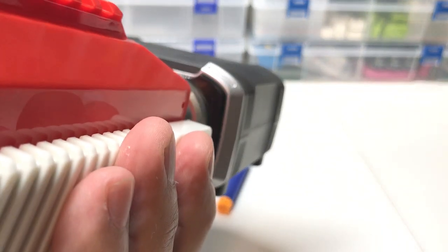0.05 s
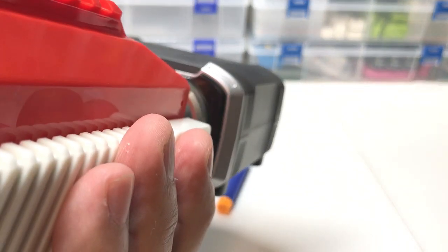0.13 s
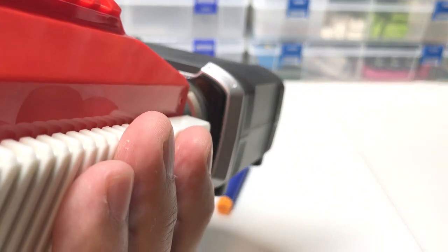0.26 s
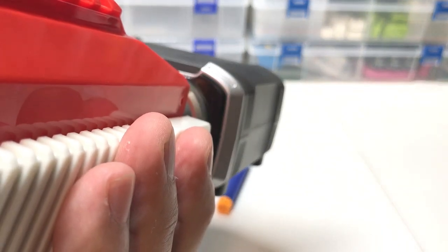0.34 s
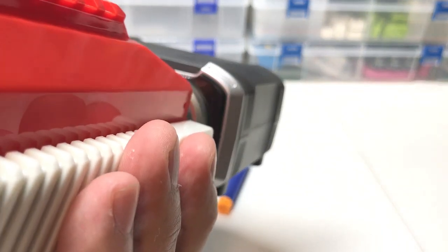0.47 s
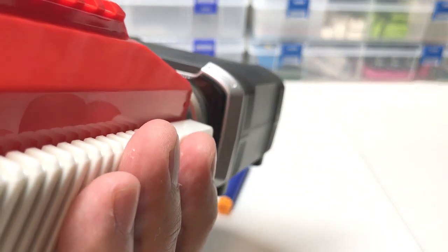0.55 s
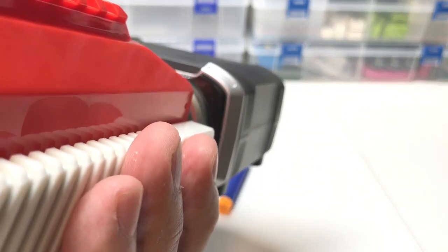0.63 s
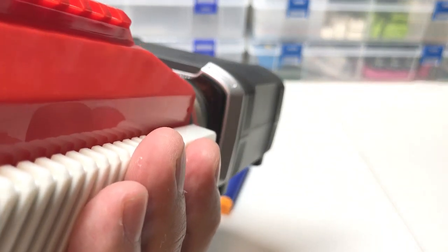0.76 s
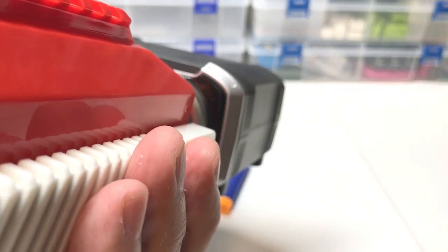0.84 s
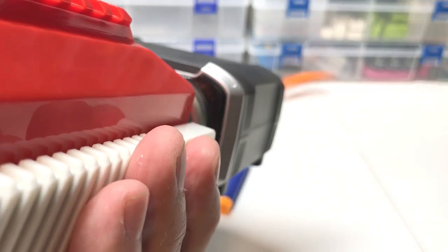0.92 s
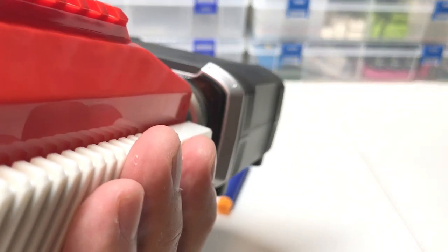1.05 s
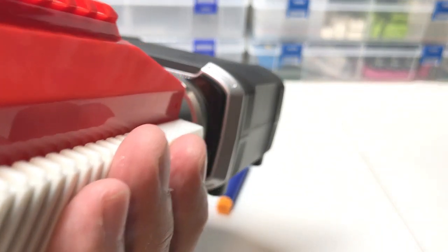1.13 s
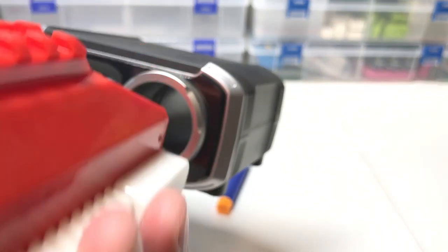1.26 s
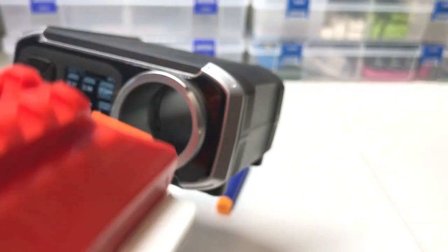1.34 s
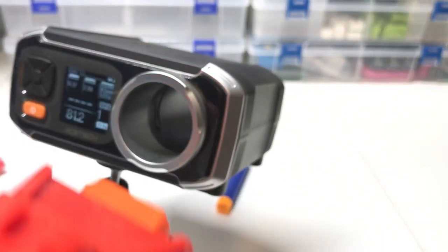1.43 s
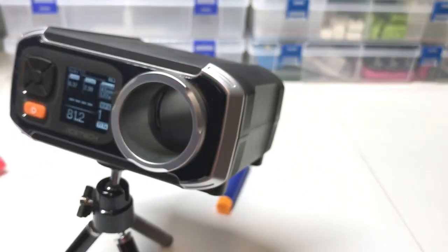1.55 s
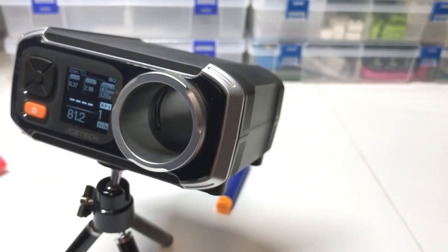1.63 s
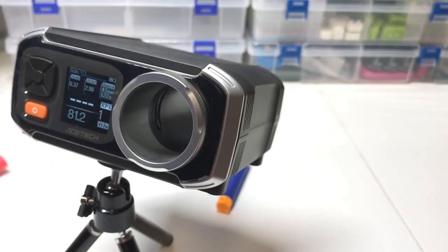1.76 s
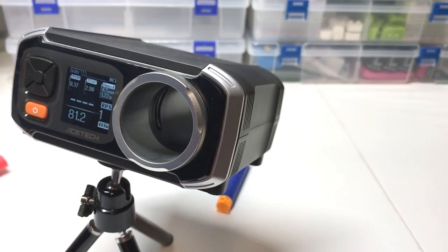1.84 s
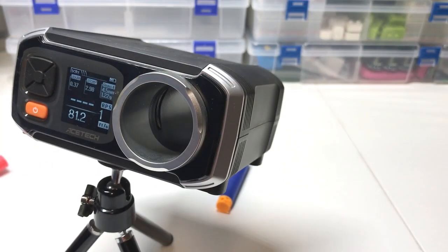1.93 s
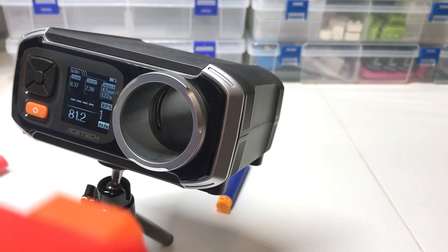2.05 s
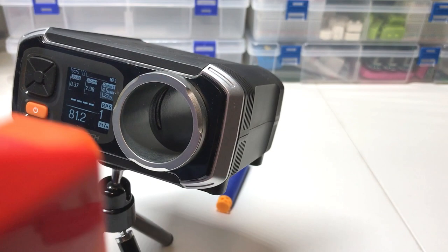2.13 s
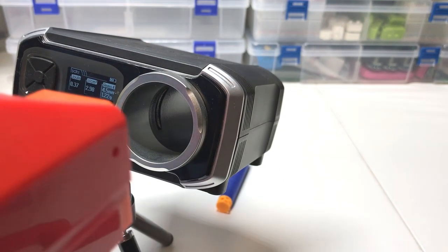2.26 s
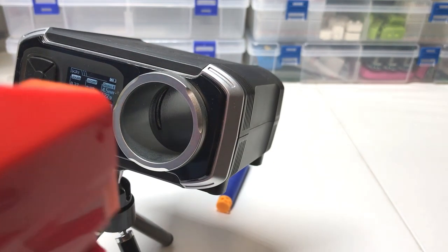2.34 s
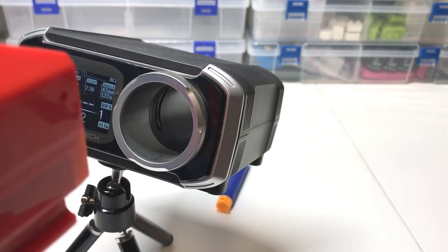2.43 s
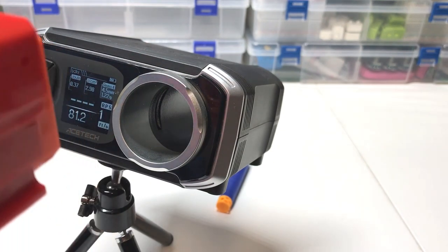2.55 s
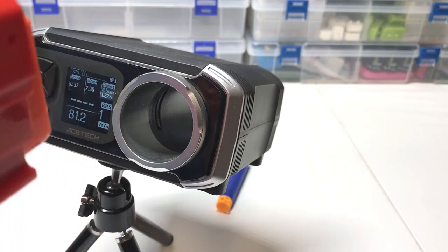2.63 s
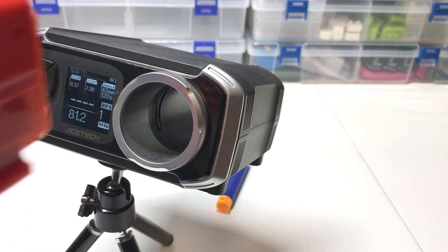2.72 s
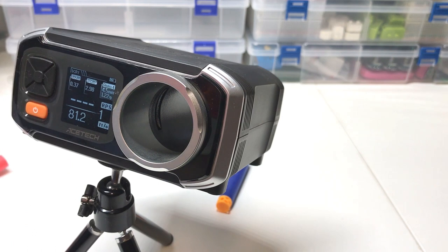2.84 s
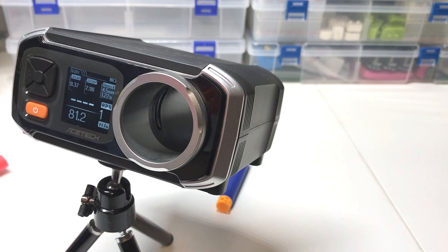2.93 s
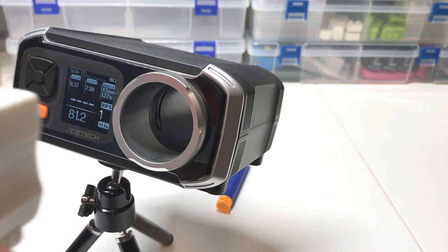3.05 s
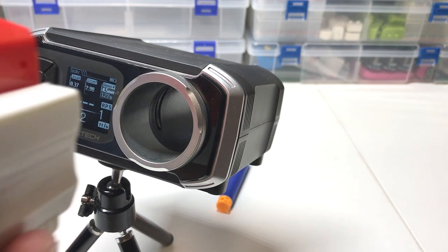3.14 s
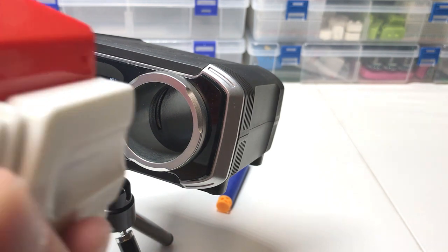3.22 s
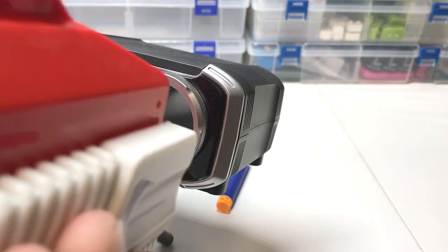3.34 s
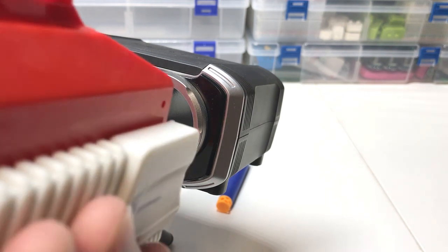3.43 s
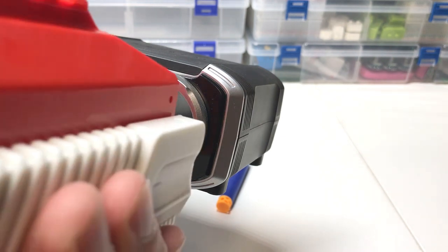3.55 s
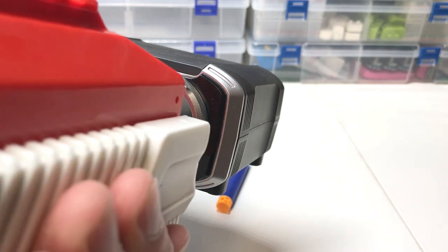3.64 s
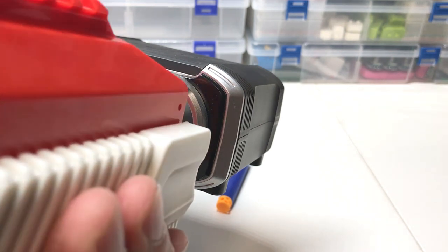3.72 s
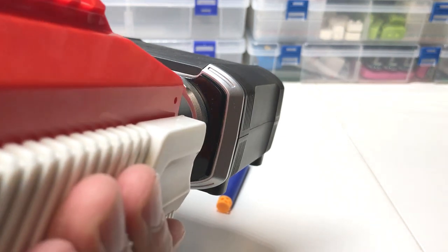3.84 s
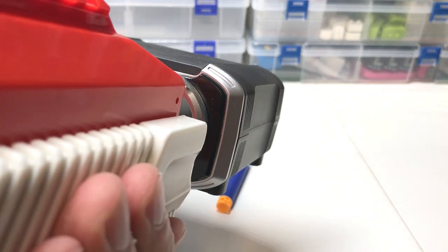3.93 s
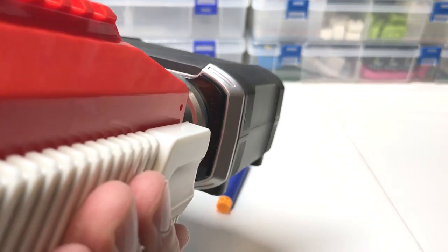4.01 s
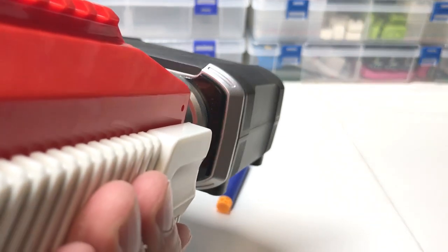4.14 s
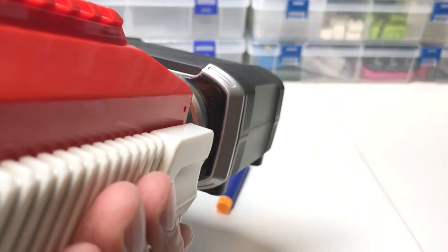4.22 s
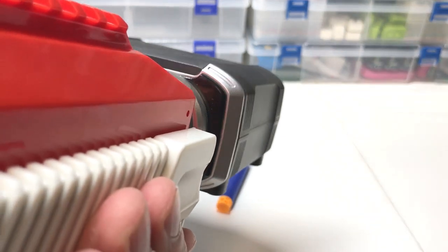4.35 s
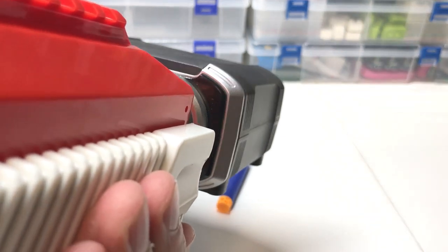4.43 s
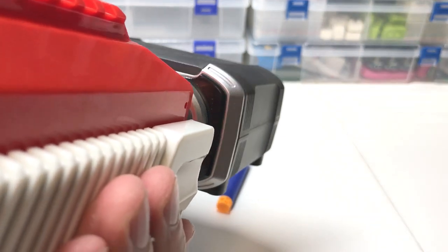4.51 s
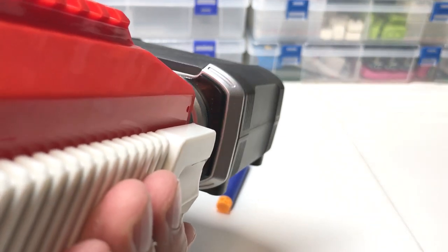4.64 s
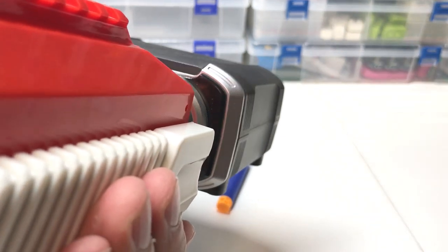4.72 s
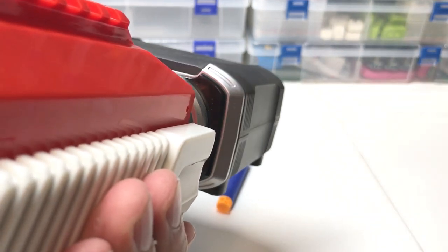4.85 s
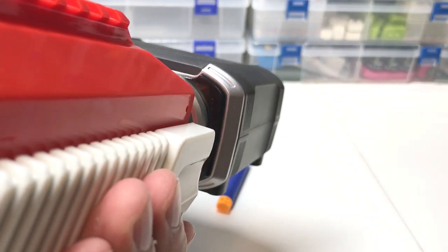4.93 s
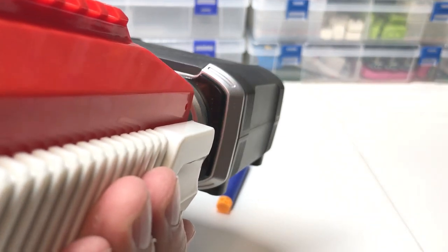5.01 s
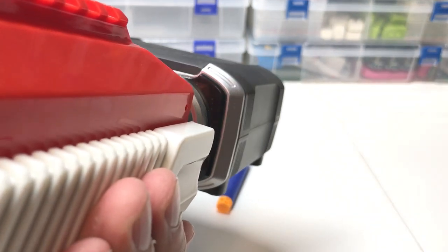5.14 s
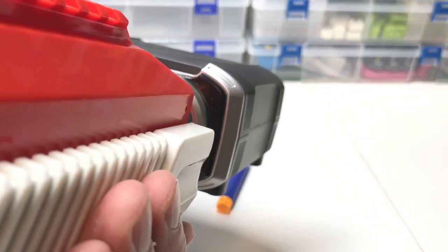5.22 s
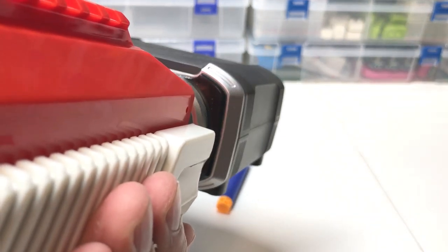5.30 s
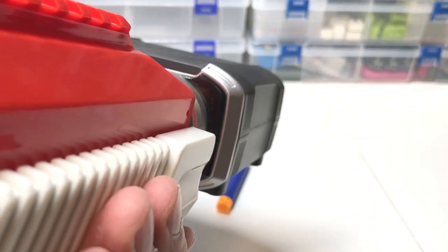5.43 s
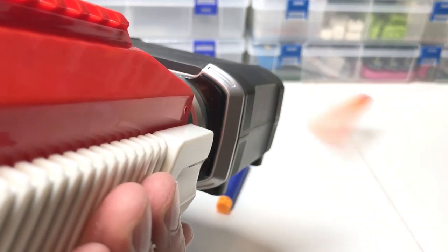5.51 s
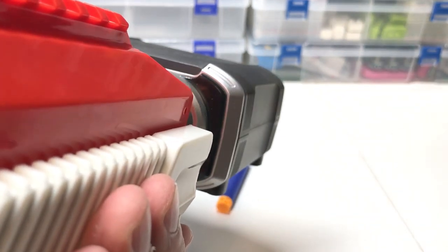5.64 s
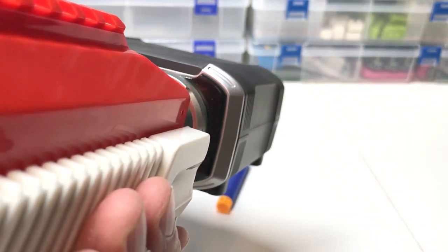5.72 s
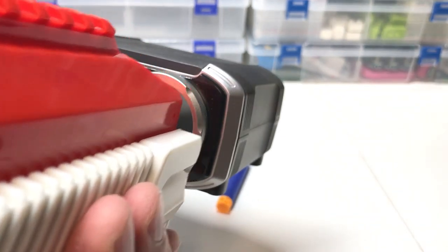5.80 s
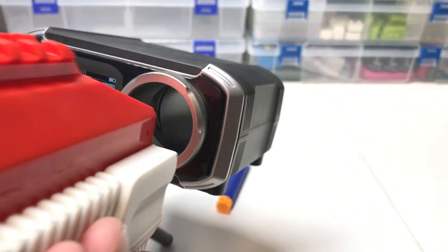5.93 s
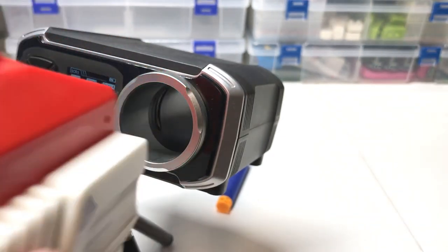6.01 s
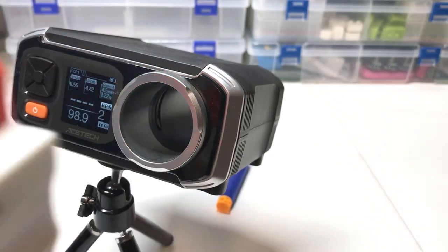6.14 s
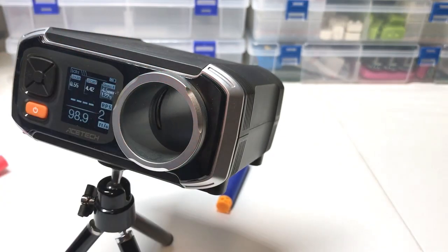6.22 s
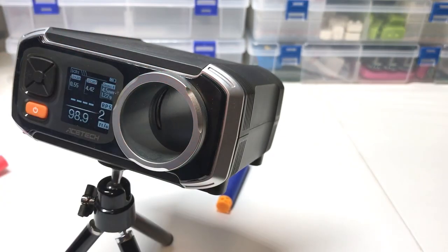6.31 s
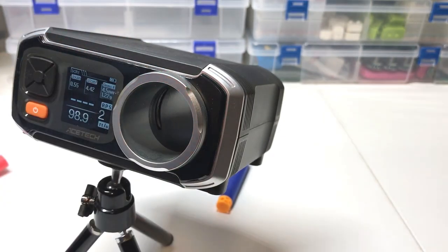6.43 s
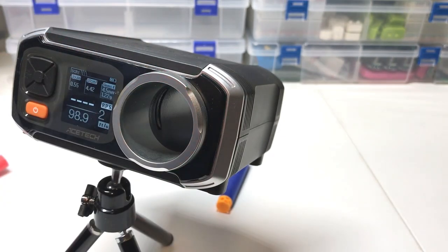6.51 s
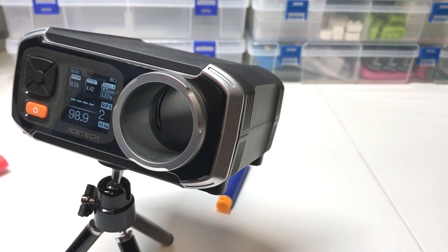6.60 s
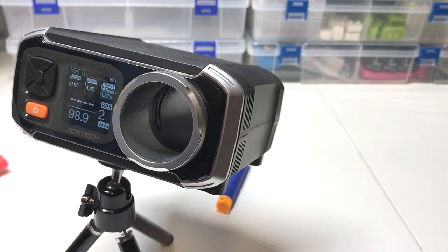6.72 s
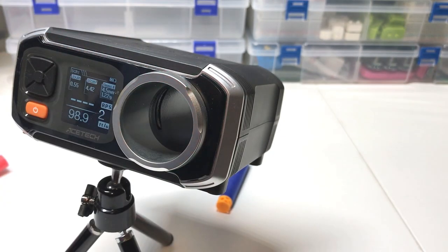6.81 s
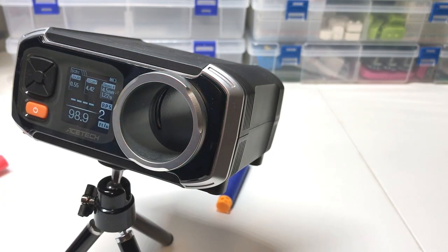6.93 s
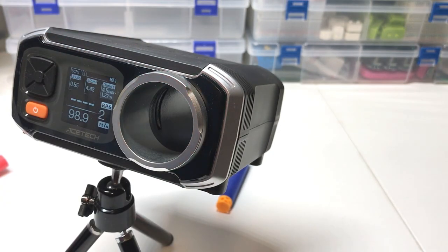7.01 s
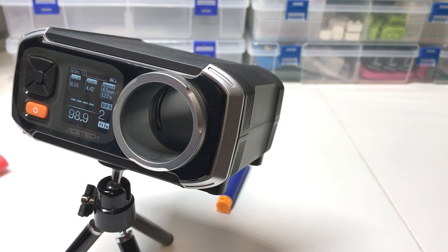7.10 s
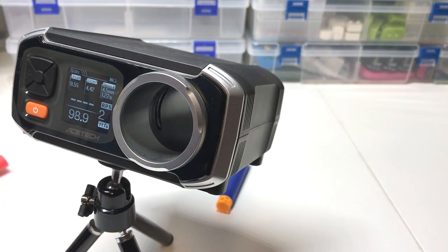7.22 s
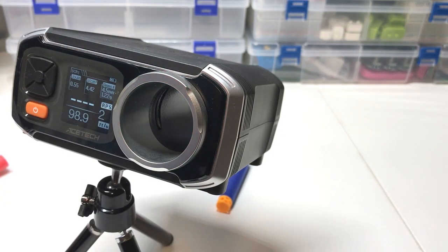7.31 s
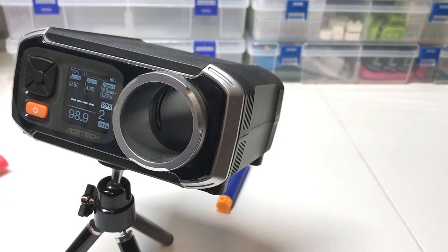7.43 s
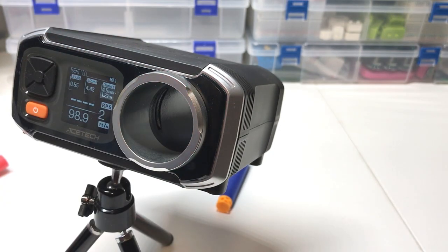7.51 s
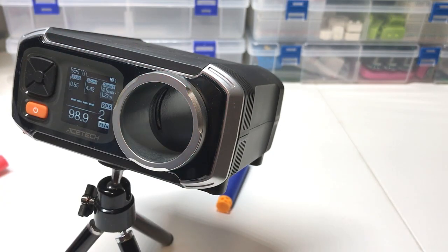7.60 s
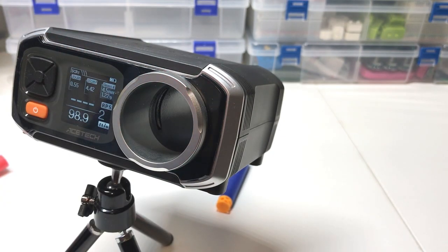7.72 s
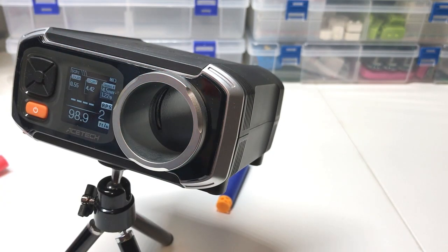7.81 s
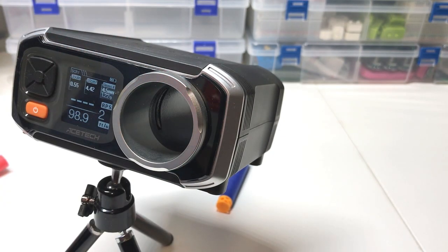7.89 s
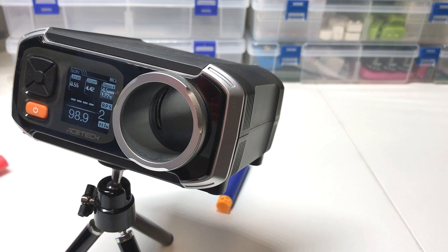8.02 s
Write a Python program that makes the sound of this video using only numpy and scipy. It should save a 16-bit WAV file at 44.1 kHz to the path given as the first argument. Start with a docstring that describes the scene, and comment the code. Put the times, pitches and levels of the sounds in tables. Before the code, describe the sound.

A small quiet room hums low for almost a second. At about 1.0 s a spring toy blaster fires right by the microphone: a brief swelling squeal, a bright overloaded plastic crack, a low air pop and quick upward whip, then grainy rattle and faint spring ringing. Around 1.2-1.5 s a dart drops on the table with hollow knocks and light clicks. Priming follows: a hard chattering clack at 2.1 s, gritty slide scrapes, and a louder, thumping clunk near 2.9 s. A dull low thud at 3.5 s and small ticks at 3.7-3.8 s settle into near silence, with very faint alternating ticks from 4 to 5.3 s. The second shot cracks at 5.56 s, similarly clipped and short. Loose clicks continue, with sharper clacks at 6.8 and 7.0 s, scraping, and a strong hollow clunk at 7.57 s, then small rattles fading until about 8 s.

```python
"""A spring blaster is fired, primed by hand, held still and fired again, close by in a small quiet room that hums low.
Each shot opens with the plunger's run: a squeal of noise that grows into the slam. The slam rattles the resonant
shell and overloads the input, then a pop and a rising whip of air; the rattle trails off in grains, spring tones ring.
After the first shot a dart drops on the table, then slides scrape as uneven grains while catches and loose parts
clack as chattering blows on the shell. Two faint ticks beat before the second shot; more handling follows it."""
import sys
import numpy as np
from scipy import signal
from scipy.fft import rfft, irfft
from scipy.io import wavfile
from scipy.ndimage import uniform_filter1d

SR = 44100
rng = np.random.default_rng(int(sys.argv[2]) if len(sys.argv) > 2 else 0)


def file_out(sig):
    """Save sig as 16-bit WAV at sys.argv[1]."""
    # one column per channel
    cols = np.atleast_2d(sig).T
    # limit, then scale
    lim = np.clip(cols, -1, 1)
    pcm = np.round(lim * 32767).astype(np.int16)
    wavfile.write(sys.argv[1], SR, pcm)


N = 355446


def undb(db):
    """Decibels to an amplitude factor."""
    return 10 ** (np.asarray(db) / 20)


def fade(t, t60):
    """Exponential decay that has lost 60 dB after t60 seconds."""
    return np.exp(-np.log(1000) * t / t60)


def unit(x):
    """Scale x to an RMS of 1."""
    return x / np.sqrt(np.mean(x ** 2))


def add(out, start_s, x):
    """Mix x into out from start_s on, cut at the end of the scene."""
    i = int(start_s * SR)
    out[i:i + len(x)] += x[:N - i]


def resonate(x, hz, width_hz):
    """Two-pole resonance along the last axis, gain 1 at the centre."""
    return signal.lfilter(*signal.iirpeak(hz, hz / width_hz, SR), x)


def grit(shape, spread_db):
    """Dense tiny impacts of very uneven size."""
    return rng.standard_normal(shape) * undb(spread_db * rng.exponential(size=shape))


# Colour of the room hum: pitch_hz [Hz], density_db [dB per Hz, relative]
HUM_COLOUR = [(12, -39.5), (20, -7.5), (60, 5), (107, -11.5), (204, -6.5), (285, -14), (472, -14.5),
              (527, -19), (949, -17), (1480, -23), (2670, -34.5), (2990, -35.5), (7520, -43),
              (12800, -44.5), (16000, -53.5)]
HUM_DB = -51  # RMS level


def hum():
    """Steady room tone: noise shaped to a spectrum that is strongest in the bass."""
    hz = np.maximum(np.fft.rfftfreq(N, 1 / SR), 1)
    pitch_hz, density_db = np.transpose(HUM_COLOUR)
    colour = undb(np.interp(np.log(hz), np.log(pitch_hz), density_db))
    noise_spectrum = rfft(rng.standard_normal(N))
    return undb(HUM_DB) * unit(irfft(noise_spectrum * colour, N))


ROOM_T60_S, ROOM_TREBLE_T60_S, ROOM_DB = 0.11, 0.14, -15.5


def room(x):
    """Diffuse tail from shelves and walls: decaying noise whose treble lasts slightly longer."""
    t = np.arange(SR // 2) / SR
    noise = rng.standard_normal(len(t))
    low = signal.lfilter(*signal.butter(1, 3000, fs=SR), noise)
    tail = low * fade(t, ROOM_T60_S) + (noise - low) * fade(t, ROOM_TREBLE_T60_S)
    tail = tail * (1 - np.exp(-t / 0.015))  # the reflections build up first
    return undb(ROOM_DB) * signal.fftconvolve(x, tail / np.linalg.norm(tail))[:N]


# Borders between the bass, low, high and treble rings [Hz]
BAND_EDGES_HZ = (900, 2300, 5000)
# Modes of the hollow shell: pitch_hz [Hz], width_hz [Hz], level_db [dB]
SHELL_MODES = [(167, 113, -1), (229, 74, -1.5), (366, 130, -0.5), (510, 100, -5), (632.6, 160, 0),
               (1050, 180, 1.5), (1289.5, 140, 4.5), (1552, 390, 2.5), (2095, 360, 0.5), (2510, 440, 1.5),
               (2983, 410, 2.5), (3700, 850, -0.5), (4438, 470, -2), (5280, 620, 1.5), (6165, 490, 0.5),
               (6810, 630, 0.5), (8850, 1800, -1.5), (9960, 2400, -2.5), (11900, 2600, -4.5),
               (14800, 2100, -8.5)]


def shell(force, pitch_hz, focus_db, scatter_db):
    """Bass, low, high and treble modal rings for each row of force, with mode levels that vary by row."""
    luck = rng.standard_normal((len(force), len(SHELL_MODES)))
    parts = np.zeros((4,) + force.shape)
    for k, (hz, width_hz, level_db) in enumerate(SHELL_MODES):
        part = np.searchsorted(BAND_EDGES_HZ, hz)
        # low and high modes weaken away from the main pitch, up to one octave off
        octaves_off = np.minimum(np.abs(np.log2(hz / pitch_hz)), 1) * (part in (1, 2))
        sign = (-1) ** k
        gain = sign * undb(level_db - focus_db * octaves_off + scatter_db * luck[:, k])
        ring = resonate(resonate(force, hz, 3.5 * width_hz), hz, width_hz)
        parts[part] += gain[:, None] * ring
    return parts


# Uneven grainy scrapes on the shell, and the rattle trailing off after each shot: full_s [s], hold_s [s],
# level_db [dB], rise_db_per_s [dB/s], fall_db_per_s [dB/s], treble_db [dB over level_db]
SCRAPES_AND_TAILS = [(1.098, 0.0092, -49, 899.5, 126, -21), (1.28, .04, -48, 150, 120, -12),
                     (1.47, .1, -57, 60, 60, -9), (2.05, 0.068, -42.5, 569, 300, -9.5),
                     (2.185, .02, -34, 279, 149.5, -12), (2.303, 0.078, -46, 150, 115, -4),
                     (2.54, .09, -59.5, 100, 62, -10), (2.833, 0.077, -30, 580.5, 245, -2),
                     (3.026, 0.22, -63, 100.5, 67.5, -2.5), (3.64, .14, -62, 60, 161.5, -9),
                     (5.655, 0.011, -48, 899, 174, -17), (5.882, 0.1, -56.5, 50.5, 136, -8),
                     (6.198, 0.0091, -51.5, 221.5, 190, -29), (6.46, .05, -62, 60, 150, 0),
                     (6.826, 0.048, -51, 67, 102, -7.5), (6.981, .02, -36, 218, 159, -7),
                     (7.048, 0.097, -45.5, 151, 84, 2.5), (7.578, 0.02, -36.5, 198, 115.5, -2),
                     (7.856, 0.22, -70, 55, 49.5, -3)]


def grain_levels_db(t):
    """Level in dB of each scrape or shot tail at times t: straight rise, hold, straight fall."""
    full_s, hold_s, level_db, rise, fall, _ = np.transpose(SCRAPES_AND_TAILS)[:, :, None]
    before_s, after_s = np.maximum(full_s - t, 0), np.maximum(t - full_s - hold_s, 0)
    return level_db - np.abs(rise) * before_s - np.abs(fall) * after_s


def scrapes_and_tails():
    """Tiny grains in uneven spurts, coloured by the shell, for the scrapes and the shots' trailing rattle."""
    steps = np.repeat(rng.standard_normal(N // 256 + 1), 256)[:N]
    spurts = uniform_filter1d(steps, size=256)
    grains = grit(N, 0.91) * undb(3.8 * spurts)
    _, low, high, treble = shell(grains[None], 1800., focus_db=0, scatter_db=0)[:, 0]
    gains = undb(grain_levels_db(np.arange(N) / SR))
    treble_gain = undb(np.array(SCRAPES_AND_TAILS)[:, 5]) @ gains
    body = unit(low) + undb(-3.5) * unit(high)
    return gains.sum(axis=0) * body + treble_gain * unit(treble)


# Hollow knocks: start_s [s], level_db [dB], pitch_hz [Hz], t60_s [s]
THUDS = [(1.232, -22, 246, 0.14), (1.236, -44, 159.7, 1), (2.086, -44, 130, 0.065),
         (2.882, -21, 108, 0.085), (2.884, -14.5, 398, 0.13), (3.472, -19.5, 59.6, 0.15),
         (7.572, -8, 393, 0.074)]


def thuds():
    """Soft pushes that each set one low mode going: a decaying sine with a rounded start."""
    t, out = np.arange(SR // 2) / SR, np.zeros(N)
    for start_s, level_db, pitch_hz, t60_s in THUDS:
        onset = 1 - np.exp(-t * pitch_hz / 2.0)
        add(out, start_s, undb(level_db) * onset * np.sin(2 * np.pi * pitch_hz * t) * fade(t, t60_s))
    return out


# Catches, stops and loose parts hitting the shell: start_s [s], level_db [peak dB of the low ring],
# pitch_hz [Hz], high_db [dB over level_db], treble_db [dB over level_db], chatter_t60_s [s]
CLACKS = [(1.169, -36, 1440, -7, -11, 0.043), (1.216, -32, 1314, -6.5, -11, .15),
          (1.228, -23.5, 1270, -7.5, -19, 0.17), (1.243, -32.5, 1670, -11, -9, 0.09),
          (1.264, -28.5, 2020, -1.5, -8, .077), (1.3353, -22, 3400, 1.5, -18, .026),
          (1.359, -35, 2050, -7, -16, .028), (1.404, -34, 1300, -8, -0.5, 0.047),
          (1.425, -28.5, 2230, 2, -12.5, .048), (1.444, -37, 2340, -13, -27, 0.1),
          (1.4974, -45, 6200, -4, 3, .05), (1.5421, -36.5, 1420, 3.5, -3.5, 0.018),
          (1.655, -38.5, 1620, -3.5, -15, 0.074), (1.674, -45, 1570, -15, -24, 0.027),
          (1.829, -48, 1290, -12, -13, 0.039), (2.018, -33.5, 1390, -6, -11, 0.071),
          (2.0268, -20, 1270, -4.5, -10.5, 0.072), (2.065, -25, 1490, -4, -14, .096),
          (2.077, -13.5, 1270, -7, -22, 0.11), (2.083, -8, 1350, -3, -8.5, 0.077),
          (2.115, -30.5, 1440, 4.5, -1, 0.091), (2.127, -24.5, 1800, -10.5, -10.5, 0.22),
          (2.189, -28.5, 3980, 2, -18, 0.021), (2.207, -18, 3990, 8, 0, 0.078),
          (2.231, -19, 1380, -18, -12, 0.096), (2.25, -39.5, 1720, 16, 12, 0.059),
          (2.266, -34, 2680, 4, 2, .035), (2.289, -47, 2770, 7, 5, .099),
          (2.342, -34.5, 1270, 1.5, -5, 0.03), (2.377, -36.5, 3420, 3, -19, 0.07),
          (2.44, -31, 1500, -4.5, -19, 0.041), (2.476, -40, 1820, -1.5, -24, 0.061),
          (2.4948, -34.5, 1580, -12, -33, .023), (2.537, -36, 1120, -2, -13, 0.059),
          (2.596, -48, 1160, -16, -23, 0.03), (2.68, -41, 1220, -8, -29, .031),
          (2.731, -30, 1950, -5.5, -30, 0.06), (2.805, -16.5, 1560, -1, -11, 0.071),
          (2.831, -27, 1210, -11, -6.5, 0.24), (2.847, -25.5, 1320, 3.5, -9, 0.17),
          (2.856, -10.5, 1710, -21, -16.5, .055), (2.876, -14, 2420, 5.5, -3, 0.098),
          (2.8802, -6.5, 1410, -6, -6, 0.082), (2.954, -35, 1500, 0.5, 0, 0.078),
          (2.977, -42, 1680, 1, 0, 0.067), (3.023, -43, 3100, 0.5, -26, 0.13),
          (3.142, -61.5, 1080, 8.5, 9, 0.11), (3.308, -54.5, 3720, 3.5, 2, .083),
          (3.378, -40.5, 1450, 0, -16.5, 0.056), (3.674, -45.5, 2190, -5.5, -30, .1),
          (3.709, -36.5, 3360, -0.5, -21, 0.063), (3.765, -45, 1280, -3, -28, .044),
          (3.802, -36.5, 1870, 3.5, -11, 0.082), (3.816, -33.5, 3170, 0, -14, 0.077),
          (4.02, -42.5, 1673, -7.5, -14, .061), (4.437, -62.5, 3500, 6.5, -12.5, 0.049),
          (4.652, -62.5, 3480, 8, -12.5, 0.047), (5.15, -63.5, 3300, 7, -13.5, .05),
          (5.69, -42.5, 1620, -2.5, -14, 0.056), (5.77, -30.5, 1280, -3, -17, 0.027),
          (5.793, -36, 1590, -6, -2.5, 0.037), (5.9278, -29.5, 1440, -0.5, -13, 0.11),
          (5.944, -34.5, 1240, -16, -6, 0.096), (5.963, -33, 1455, -2, -9.5, .098),
          (6.1345, -54, 1010, -9, -1, 0.11), (6.155, -41, 2330, 0.5, -12, 0.13),
          (6.1915, -39.5, 2930, 5.5, -6, 0.039), (6.2225, -33.5, 2070, -5, -16, 0.065),
          (6.2433, -27, 1340, -9.5, -26, 0.09), (6.4226, -48.5, 1046, 0, -12.5, 0.077),
          (6.565, -43.5, 1110, -6, -11.5, 0.11), (6.5986, -34.5, 1420, -7.5, -25, 0.36),
          (6.621, -27, 1420, 0, -8, 0.069), (6.65, -29, 1320, -14, -24, 0.057),
          (6.7444, -40.5, 1390, -8, -14, 0.16), (6.763, -34.5, 1630, -4, -14, 0.23),
          (6.782, -15.5, 2380, -5.5, -13, 0.086), (6.9134, -33.5, 1320, -3.5, -19, 0.19),
          (6.9291, -27, 1410, -8, -18, .046), (6.982, -26, 4060, 3, -6.5, 0.15),
          (6.9955, -14.5, 1920, -2, -1.5, 0.092), (7.0197, -21.5, 1630, 0, -1, 0.073),
          (7.146, -44, 1170, -2.5, -27, 0.05), (7.208, -39, 1310, -3, -13, 0.11),
          (7.237, -32, 1920, 1, -2, 0.14), (7.305, -27, 2200, 0, -2.5, 0.073),
          (7.3802, -36.5, 1860, -2, -23, .084), (7.454, -45, 1280, -8, -29, .05),
          (7.4675, -26, 1890, -2.5, -7.5, 0.29), (7.494, -21.5, 980, -4.5, -11.5, 0.19),
          (7.5324, -18.5, 1960, -8, -17, 0.059), (7.542, -16.5, 1700, -7, -13, .19),
          (7.5683, -6.5, 1375, -6.5, -6.5, 0.11), (7.643, -42, 1600, 7, -12, 0.055),
          (7.656, -41, 1740, 9, 1, 0.068), (7.73, -40, 1770, 3, -6, 0.042),
          (7.913, -40.5, 1920, -5, -14, 0.14), (7.94, -46, 1210, -3, -14, .079),
          (7.959, -31, 2380, 2, -4.5, 0.075), (7.998, -47, 1330, -6, -23, .077),
          (8.043, -45.5, 1890, 3, -11, 0.039)]
# Two faint beats, each about four a second: start_s [s], level_db [peak dB of the low ring]
TICKS = [(4.0675, -49), (4.287, -50), (4.529, -45), (4.766, -42), (4.994, -43), (5.25, -48)]
TOCKS = [(3.9355, -49), (4.2, -47.5), (4.455, -51), (4.708, -51.5), (4.949, -54.5), (5.183, -50)]
# Their colours: pitch_hz [Hz], high_db [dB], treble_db [dB], chatter_t60_s [s]
TICK_COLOUR = (3124, -1.5, -22, .058)
TOCK_COLOUR = (1404, -11, -27, .06)
# Colour of small ticks shaken loose: high_db [dB], treble_db [dB], chatter_t60_s [s]
LOOSE_COLOUR = (-3, -12.5, .07)
LOOSE_COUNT = 50
LOOSE_DB, LOOSE_SPREAD_DB = 3.5, 2.5  # over the loudest scrape or tail at that moment, give or take


def blows():
    """All blows as columns: the listed clacks, the faint beats and loose ticks at random times."""
    when, size, pitch = rng.random((LOOSE_COUNT, 3)).T
    start_s = when * N / SR
    level_db = grain_levels_db(start_s).max(axis=0) + LOOSE_DB + LOOSE_SPREAD_DB * (2 * size - 1)
    pitch_hz = 1100 * 2 ** (1.8 * pitch)
    loose = [(*row, *LOOSE_COLOUR) for row in zip(start_s, level_db, pitch_hz)]
    ticks = [(*row, *TICK_COLOUR) for row in TICKS]
    tocks = [(*row, *TOCK_COLOUR) for row in TOCKS]
    return np.transpose(list(CLACKS) + ticks + tocks + loose)


# Span in which the dart lands on the table: start_s [s], end_s [s]
TABLE_S = (1.2, 1.3)
BASS_DB, TABLE_BASS_DB = -16.5, -4  # bass ring against the low one; fuller on the table


def clacks():
    """Each clack is a blow that chatters out and rings the shell; the treble ring is damped soonest."""
    start_s, level_db, pitch_hz, high_db, treble_db, t60_s = blows()
    on_table = (start_s > TABLE_S[0]) & (start_s < TABLE_S[1])
    bass_db = np.where(on_table, TABLE_BASS_DB, BASS_DB)
    t, out = np.arange(8192) / SR, np.zeros(N)
    # a long chatter also builds more slowly; a short burst stresses the first contact
    t60_s = np.clip(t60_s, .005, .3)[:, None]
    chatter = (1 - np.exp(-t / (0.0088 * t60_s))) * (fade(t, t60_s) + 0.99 * fade(t, 0.0071))
    force = grit((len(start_s), len(t)), 2.5) * chatter
    parts = shell(force, pitch_hz, focus_db=9.0, scatter_db=2.3)
    # the struck part adds its own short ring
    for k in range(len(start_s)):
        part = 1 + int(pitch_hz[k] > BAND_EDGES_HZ[1])
        parts[part, k] += undb(1.5) * resonate(force[k], pitch_hz[k], 91)
    damping_t60_s = np.array([0.39, 0.41, 0.6, 0.36])  # bass, low, high, treble
    parts = parts * fade(t, damping_t60_s[:, None, None])
    # set each ring by its peak level over 4 ms
    parts = parts / np.sqrt(uniform_filter1d(parts ** 2, size=176).max(axis=2, keepdims=True))
    gains = undb(level_db + np.array([bass_db, 0 * start_s, high_db, treble_db]))
    for when_s, x in zip(start_s, (gains[:, :, None] * parts).sum(axis=0)):
        add(out, when_s, x)
    return out


# Jolts to the spring: start_s [s], level_db [dB], touched_s [s], bass_db [dB, added to the lowest tones]
TWANGS = [(0.9985, -38, 1, 3.5), (5.561, -43, 6.5, 0.5), (5.773, -44, 5.93, -10.5)]
# Tones of the coil: pitch_hz [Hz], level_db [dB], t60_free_s [s], t60_touched_s [s]
SPRING_TONES = [(184, -3, 2, 0.39), (372, -5.5, 1.3, .8), (1230, -2.5, 1.1, .1), (1670, -2, 2.1, 0.11),
                (1670, -9.5, 1.8, 1.3)]


def spring():
    """The coil rings at its own tones after each jolt and decays at another rate once touched."""
    t, out = np.arange(N) / SR, np.zeros(N)
    for start_s, twang_db, touched_s, bass_db in TWANGS:
        free = np.clip(t, start_s, touched_s) - start_s
        touched = np.maximum(t - touched_s, 0)
        for pitch_hz, tone_db, t60_free_s, t60_touched_s in SPRING_TONES:
            decay = (t > start_s) * fade(free, t60_free_s) * fade(touched, t60_touched_s)
            level_db = twang_db + tone_db + bass_db * (pitch_hz < BAND_EDGES_HZ[0])
            out += undb(level_db) * decay * np.sin(2 * np.pi * pitch_hz * t)
    return out


def plunger_run(t, run_s):
    """The seal squeals along the tube: noise with a narrow and a broad resonance, louder towards the slam."""
    noise = grit(int(run_s * SR), 0.95)
    squeal = 2 * t[:len(noise)] / run_s * unit(resonate(noise, 3120, 120))
    hiss = undb(-14.5) * unit(noise)
    body = undb(0.5) * unit(resonate(noise, 600, 700))
    return undb(np.linspace(-20, 8, num=len(noise))) * (squeal + hiss + body)


def slam_rattle(t, rattle_s, exit_s):
    """The slam shakes the shell: uneven noise starts with a crack, dips as the dart leaves, then fades."""
    crack_and_dip = 1 + 1.5 * fade(t, 0.0093) - 0.43 * np.exp(-((t - exit_s - .004) / 0.0033) ** 2)
    hold_and_fade = np.where(t < rattle_s, 1, fade(t - rattle_s, 0.063))
    force = grit(len(t), 5.3) * crack_and_dip * hold_and_fade
    parts = shell(force[None], 2200., focus_db=0, scatter_db=1.0)[:, 0]
    parts = parts / np.std(parts[:, :2048], axis=1, keepdims=True)
    # the first contact is bright; the lower modes take a few ms to build
    build_s = np.array([0.003, 0.0071, 0.00026, .0003])
    parts = parts * (1 - np.exp(-t / build_s[:, None]))
    return undb([-17.0, -4, -3.0, -8]) @ parts  # bass, low, high, treble


def air_pop(t):
    """The barrel's air column thumps once the dart is out: two decaying sines."""
    thump = np.sin(2 * np.pi * 112 * t) * fade(t, 0.036)
    return thump + undb(-5.5) * np.sin(2 * np.pi * 430 * t) * fade(t, 0.04)


def air_whip(t):
    """A whip of air: a short sine burst sweeping up from 600 Hz."""
    sweep_hz = 600 * np.exp(np.minimum(t / .006, 2))
    return np.sin(2 * np.pi * np.cumsum(sweep_hz) / SR) * np.exp(-((t - .0055) / .003) ** 2)


# Moments the plunger slams home: start_s [s]
SLAMS_S = (.9964, 5.5602)
# One row a slam: rattle_db [dB], rattle_s [s], pop_db [dB], run_db [dB], whip_db [dB]
SHOTS = [(-5, 0.032, -3.5, -37, -5.5), (-5.5, 0.028, 0.5, -40.5, -4.5)]


def shots(run_s=.023, exit_s=.0062):
    """Plunger run into the slam and its rattle, then pop and whip from exit_s after the slam."""
    t, out = np.arange(SR // 2) / SR, np.zeros(N)
    for slam_s, (rattle_db, rattle_s, pop_db, run_db, whip_db) in zip(SLAMS_S, SHOTS):
        add(out, slam_s - run_s, undb(run_db) * plunger_run(t, run_s))
        add(out, slam_s, undb(rattle_db) * slam_rattle(t, rattle_s, exit_s))
        add(out, slam_s + exit_s, undb(pop_db) * air_pop(t) + undb(whip_db) * air_whip(t))
    return out


def scene():
    """The blaster's sounds, their room tail and the hum, as one channel."""
    near = clacks() + scrapes_and_tails() + shots() + spring() + thuds()
    return (near + room(near) + hum())[None]


TOP_HZ = 15950


def record(dry):
    """The microphone drops the deepest bass, the input saturates sharply at full scale, the top is cut."""
    picked = signal.sosfilt(signal.butter(2, 42, "high", fs=SR, output="sos"), dry)
    clipped = picked / (1 + np.abs(picked) ** 8) ** (1 / 8)
    return signal.sosfilt(signal.ellip(8, .2, 60, TOP_HZ, fs=SR, output="sos"), clipped)


dry = scene()
out = record(dry)
file_out(out)
```